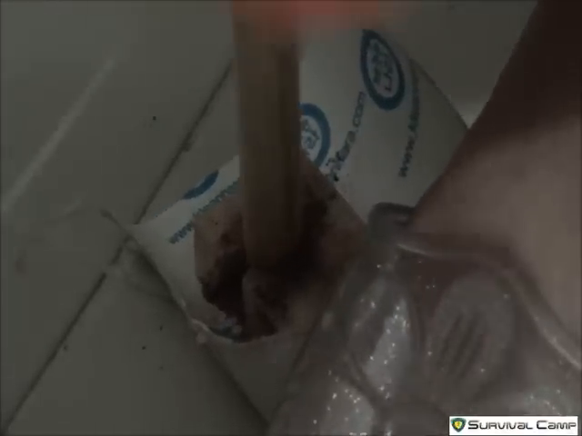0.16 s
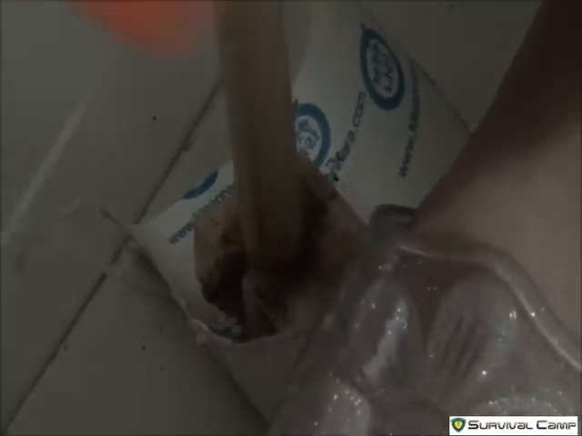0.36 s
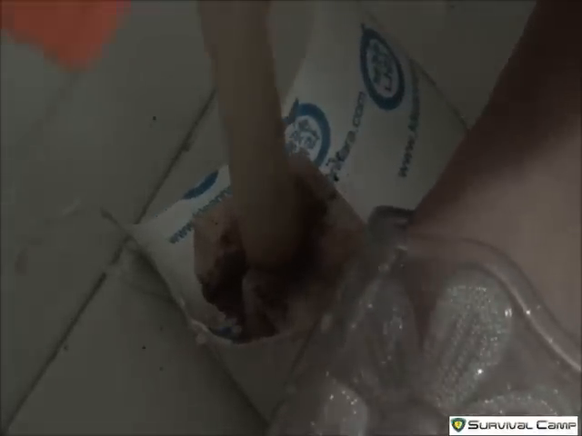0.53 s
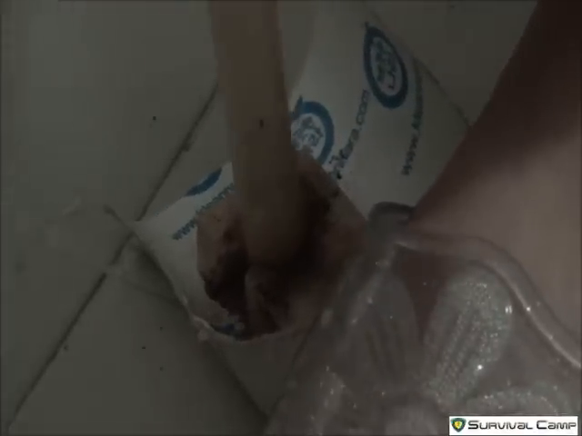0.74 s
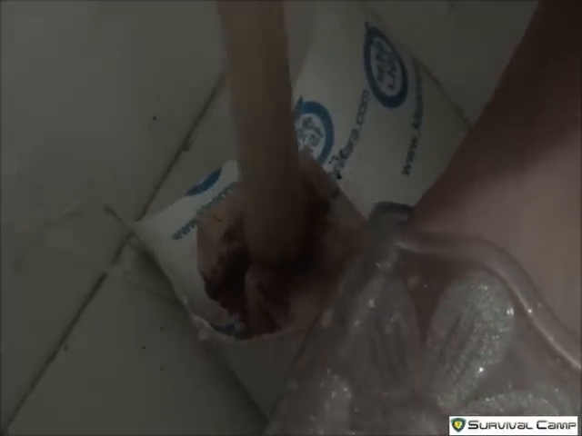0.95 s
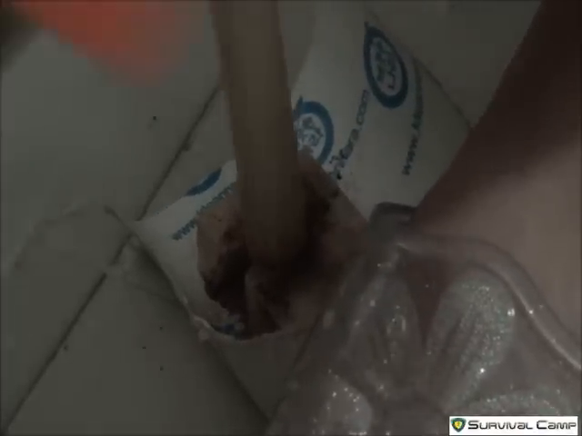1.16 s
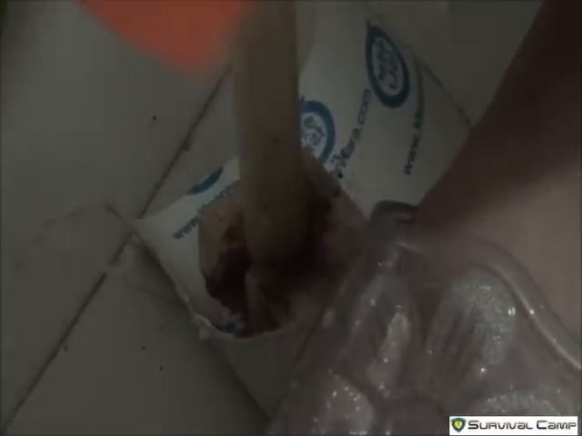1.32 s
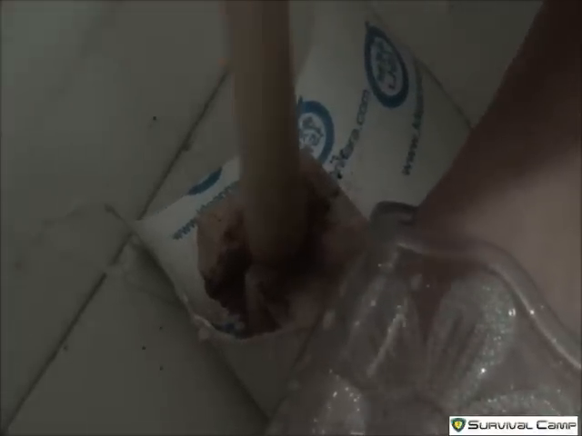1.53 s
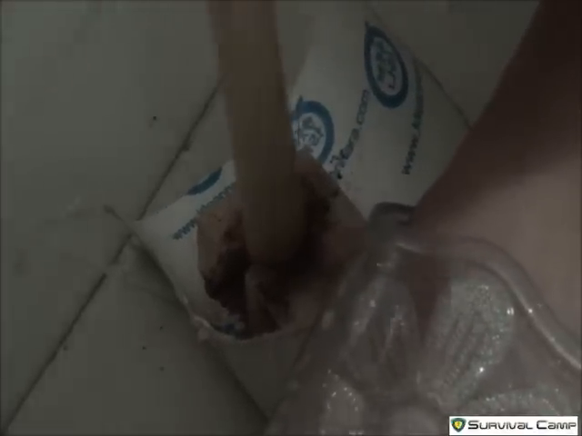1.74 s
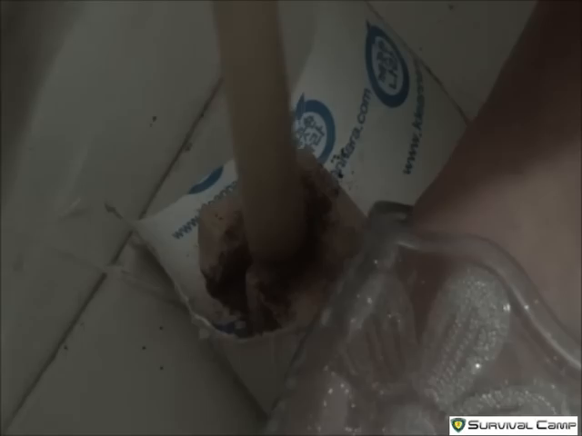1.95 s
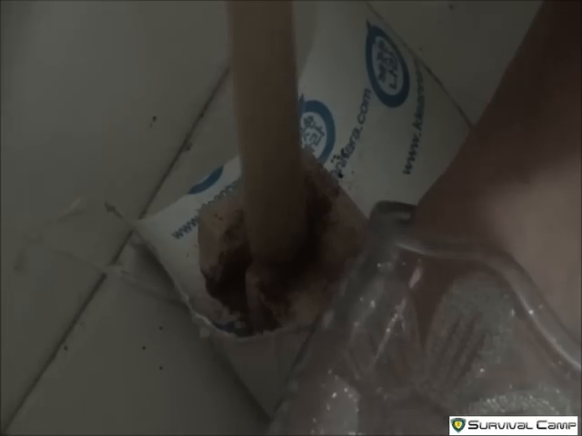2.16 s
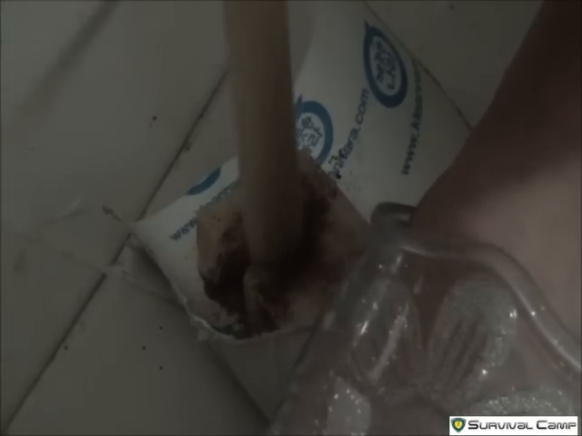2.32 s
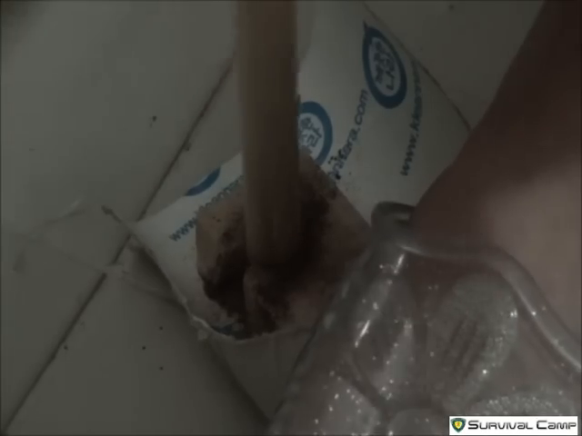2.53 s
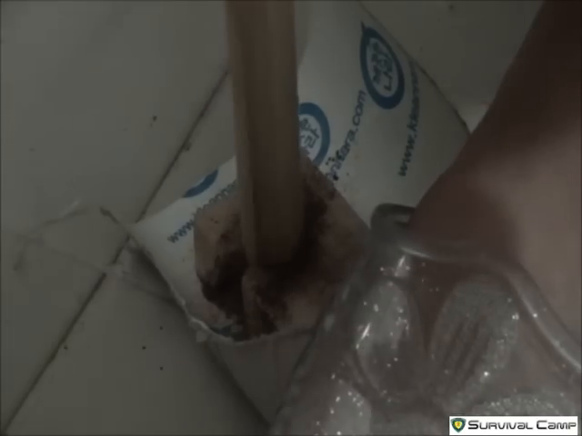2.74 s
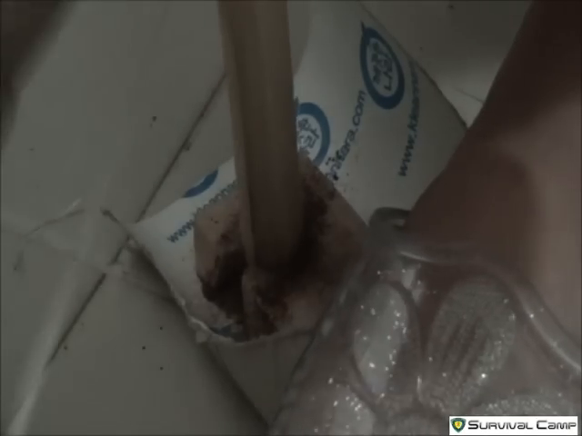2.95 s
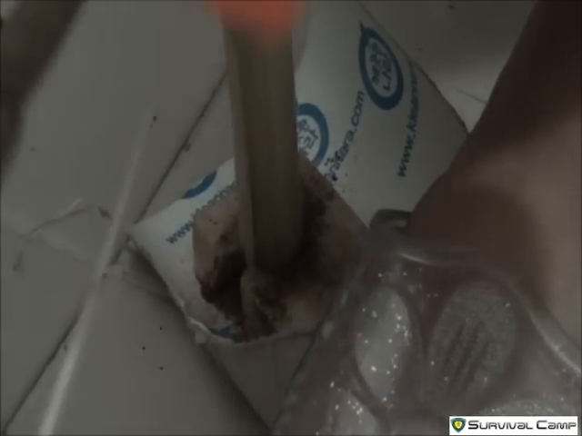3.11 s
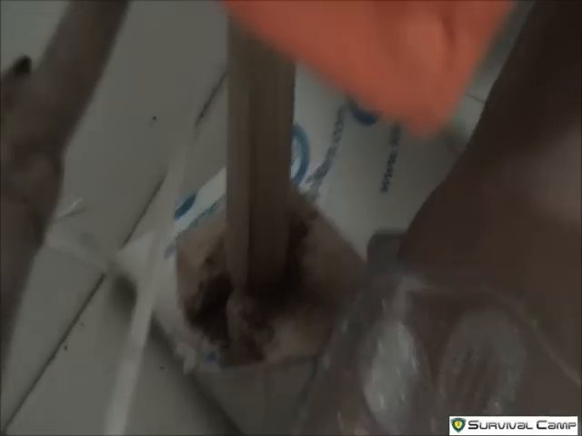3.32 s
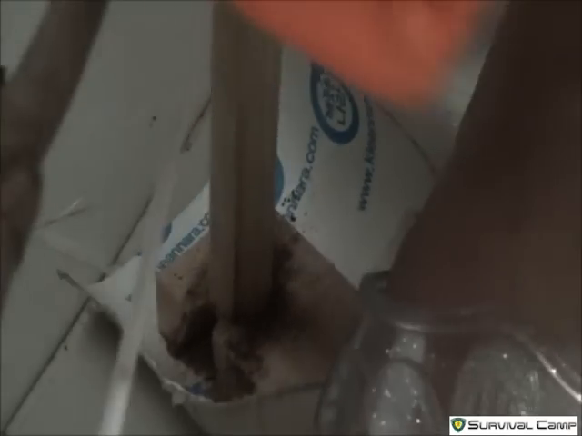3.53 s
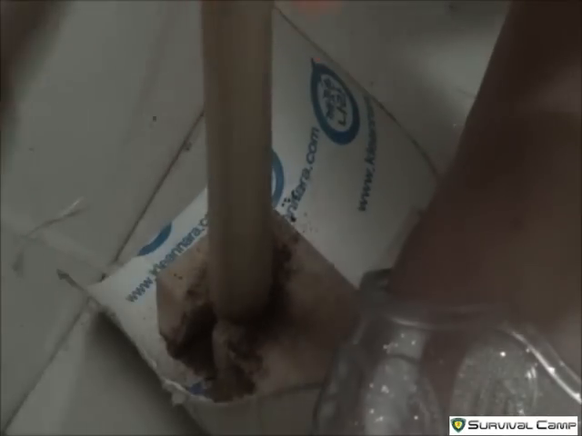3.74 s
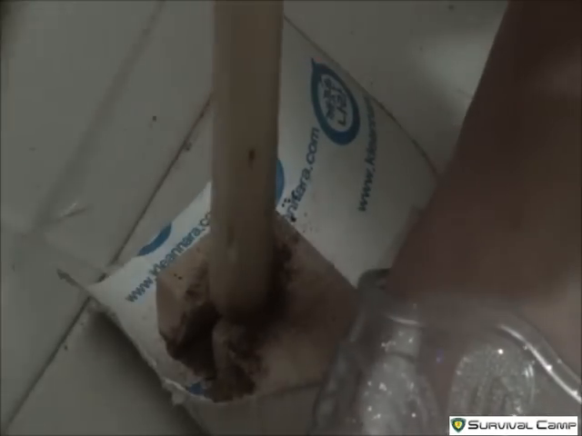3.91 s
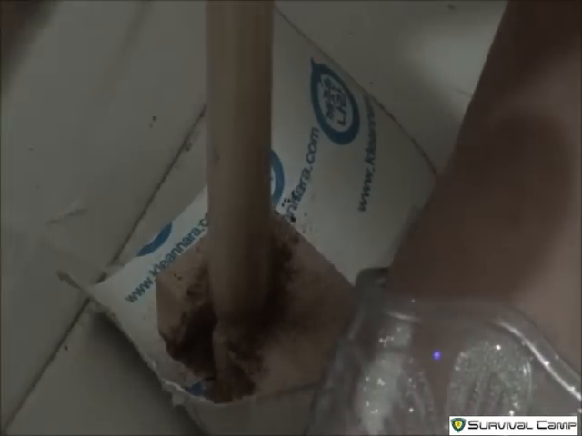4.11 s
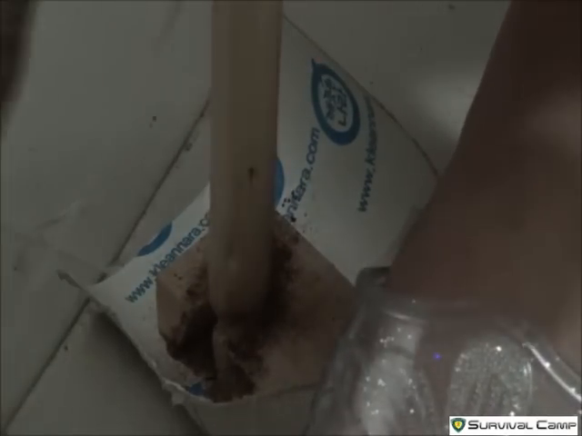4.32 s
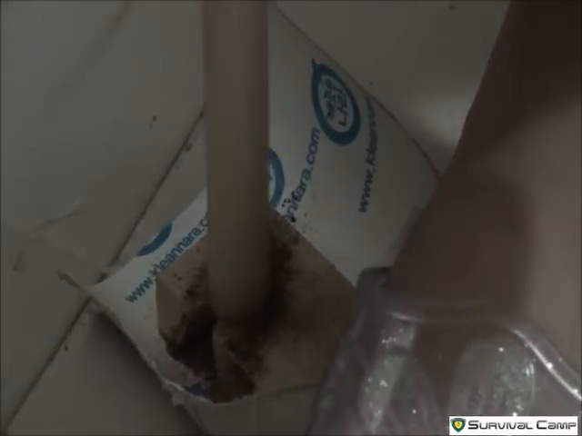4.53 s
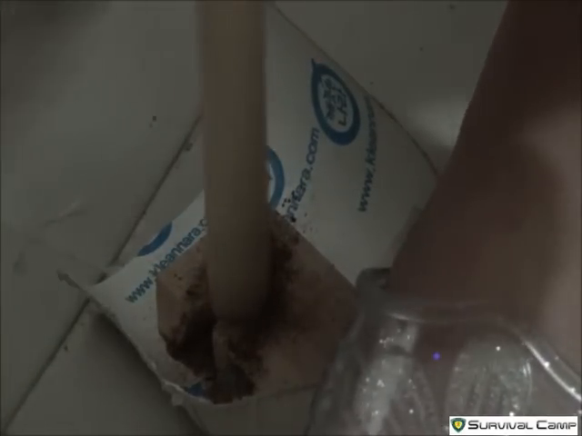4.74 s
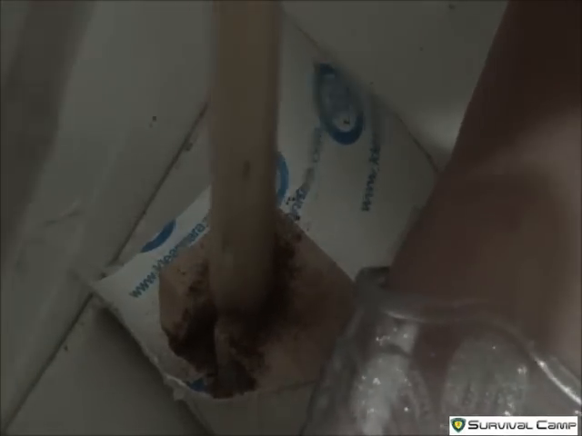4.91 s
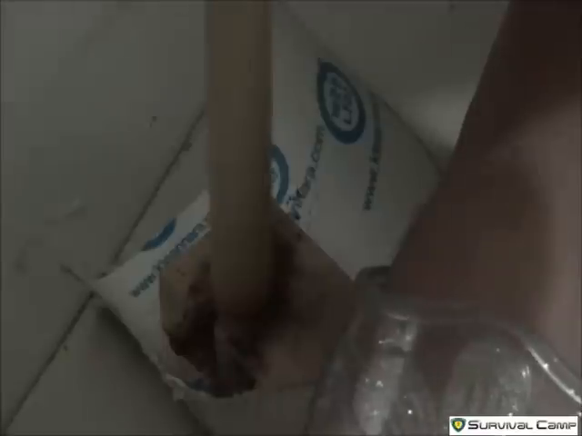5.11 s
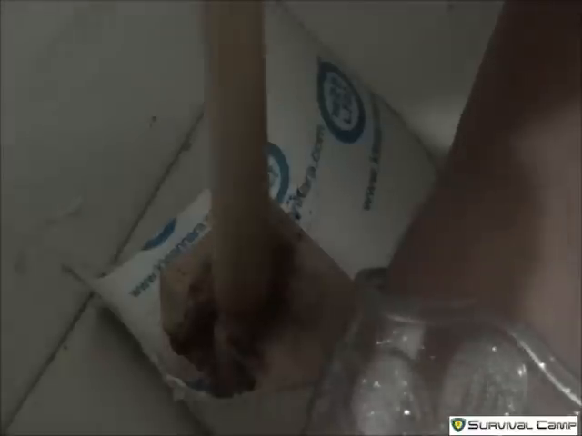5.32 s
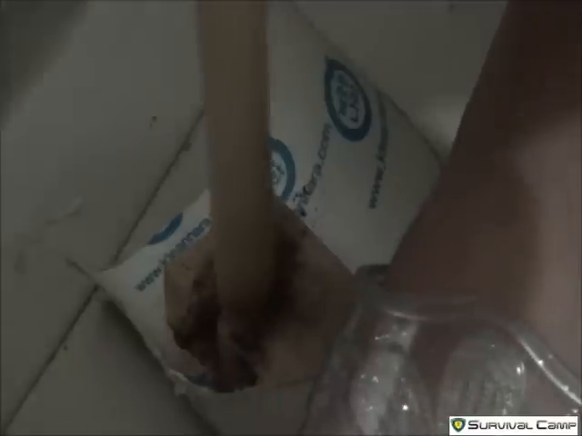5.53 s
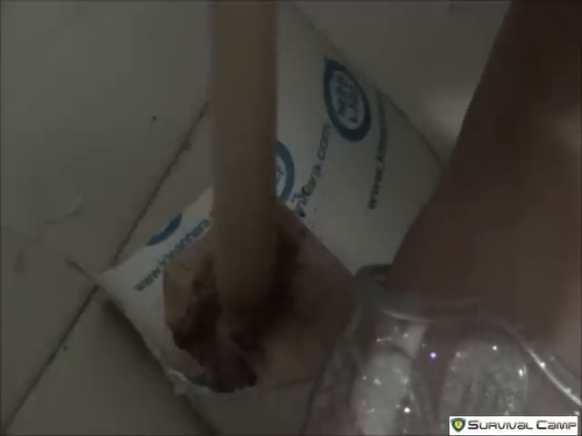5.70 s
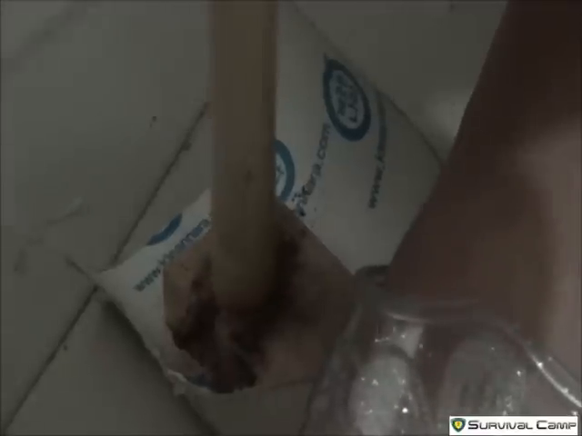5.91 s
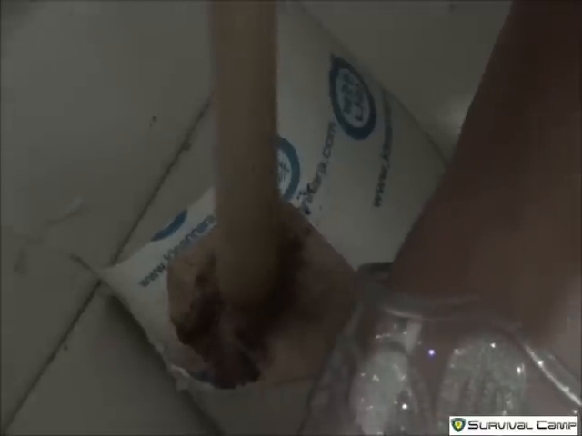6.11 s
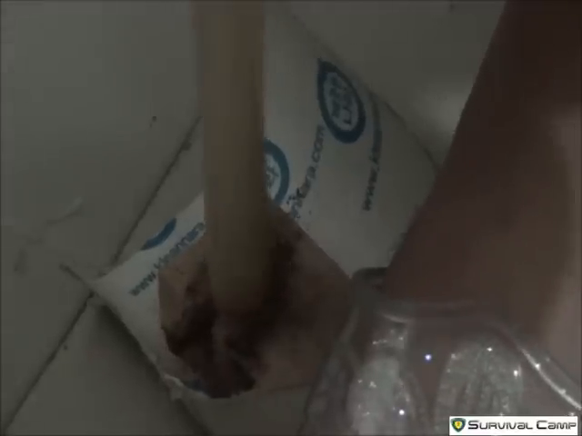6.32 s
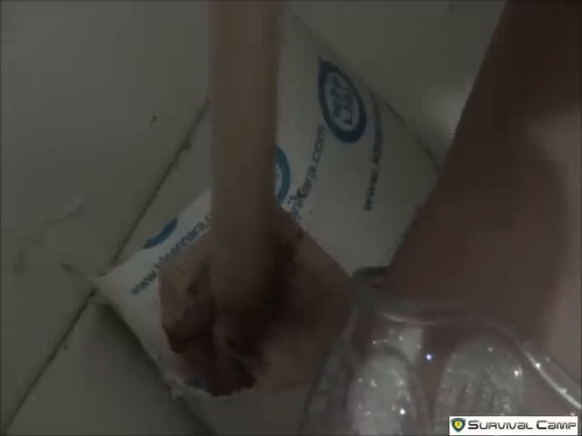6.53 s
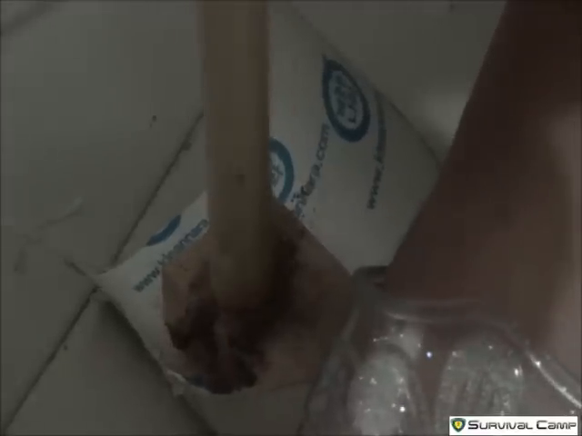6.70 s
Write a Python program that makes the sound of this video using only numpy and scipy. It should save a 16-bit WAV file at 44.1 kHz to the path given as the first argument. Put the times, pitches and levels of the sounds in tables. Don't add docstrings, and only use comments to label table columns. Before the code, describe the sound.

A close, dry bow drill starts at once: short alternating wooden rasps, roughly one every 0.15 seconds, each swelling and braking quickly. They are gritty and bright, with ringing, hissy highs over a duller board chatter. Light knocks fall near 0.7, 1.1 and 1.6 seconds, and brief rough groans colour strokes between 1.3 and 2.3. A firmer knock comes at 2.5, then the rasping dies away after 2.7. From about 2.85 to 3.65 there are only faint scuffs and tiny cord ticks over distant machine hum. Strokes resume near 3.8 with a strong knock at 3.9 and a sharp cord snap at 4.2. From 4.7 to the end the rubbing is faster, louder and heavier, with short groans, low rocking thuds and stronger floor knocks near 4.9, 5.5, 5.75, 6.0 and 6.6. The small hard room adds bright reflections throughout.

```python
import sys
import numpy as np
from scipy import signal
from scipy.fft import rfft, irfft, next_fast_len
from scipy.io import wavfile
from scipy.ndimage import uniform_filter1d, map_coordinates

SR = 44100
rng = np.random.default_rng(int(sys.argv[2]) if len(sys.argv) > 2 else 0)


def to_wav(sig):
    pcm = np.clip(np.atleast_2d(sig), -1, 1) * 32767
    pcm = np.round(pcm).astype(np.int16)
    wavfile.write(sys.argv[1], SR, pcm.T)


def nominal_scale(level):
    x = np.asarray(level, float) / 20
    return 10 ** x


N = 298116

# f/Hz, width/Hz, level/dB
BOARD_MODES = [(116, 75, -18), (215, 27, -0.5), (341, 30.5, -2), (416.6, 44, -1.5), (640, 59, 0),
               (780, 69, 1.5), (870, 250, -6), (1100, 264, -1), (1450, 2500, -7.5)]
# f/Hz, width/Hz, level/dB
BOW_MODES = [(1010, 650, -1.5), (1680, 480, 3), (2960, 1150, -1.5)]
# t/s, level/dB
HAND_WEIGHT = [(0, -3), (.6, -7.5), (1.3, -2.5), (2.3, 0.5), (2.7, -0.5), (3.4, 3), (3.9, 1), (4.6, -1),
               (5.3, 2.5), (6.0, 1), (6.76, 4.5)]
# bite t/s, hold/s, level/dB, swell over the hold/dB, grip on the socket wall/dB
PUSHES = [(0.012,0.031,-25,4.5,-2.5), (0.473,0.054,-25,-2.5,-2.5), (0.797,0.056,-22.5,1.5,0),
          (1.126,0.036,-24,-4.5,-0.5), (1.405,0.068,-23.5,0,2), (1.713,0.05,-23.5,-3.9,1.5),
          (2.006,0.041,-22.5,-4,3.5), (2.309,0.055,-23.5,-7,2.5), (2.633,0.062,-27,0,0),
          (3.788,0.093,-22.5,7.5,-3.5), (4.126,0.003,-37,9,1.5), (4.416,0.063,-22,2.5,-1),
          (4.734,0.042,-20,0.5,0), (5.009,0.048,-22.5,-4.5,0.5), (5.284,0.045,-21,-1.5,-1.5),
          (5.563,0.041,-21,1,-2), (5.834,0.045,-21.5,-2.5,0), (6.106,0.048,-21,0,0.5),
          (6.381,0.048,-21.5,2.5,-1), (6.67,0.07,-25.5,-6.5,0.5)]
# bite t/s, hold/s, level/dB, swell over the hold/dB
PULLS = [(0.26, 0.075, -43, 10.9), (0.621, 0.058, -25.0, 2.5), (0.942, 0.088, -27, 1.5),
         (1.236, 0.071, -25.5, 6), (1.538, 0.079, -24.0, 1), (1.837, 0.063, -23, 5.5),
         (2.139, 0.064, -24.5, 0), (2.452, 0.053, -26.5, -2.5), (3.186, 0.064, -55.5, -4.4),
         (3.338, 0.11, -47.5, 1), (3.986, 0.075, -27, 2), (4.272, 0.047, -26.0, 6), (4.572, 0.069, -23, 3),
         (4.856, 0.046, -20.5, 2), (5.13, 0.045, -20.5, 0), (5.409, 0.033, -19.5, 0),
         (5.684, 0.05, -20.4, 0.3), (5.949, 0.038, -20, 1.5), (6.234, 0.063, -23, -3.5),
         (6.512, 0.04, -22, 0)]
PUSH = dict(attack_db=10, release_db=20.5, wall_db=-4, shaft_db=-8, rim_db=-2.5)
PULL = dict(attack_db=10.5, release_db=16, wall_db=-8.5, shaft_db=-7.5, rim_db=-1.34)


def unit(x):
    return x / np.sqrt(np.mean(x ** 2) + 1e-20)


def along(points, hz):
    f, v = np.transpose(points)
    return np.interp(np.log(hz + 1), np.log(f + 1), v)


def curves(rows):
    s, *cols = np.transpose(rows)
    return [np.interp(np.arange(N) / SR, s, c) for c in cols]


def wobble(rate, size=N):
    return map_coordinates(rng.standard_normal(size // 64), [np.arange(size) * rate / SR])


def filtered(x, response):
    m = next_fast_len(N + SR // 2)
    return irfft(rfft(x, m) * response(np.fft.rfftfreq(m, 1 / SR)), m)[..., :N]


def modes(table):
    def response(f):
        total = 0
        for k, (centre, width, db) in enumerate(table):
            damping = 1j * f * width
            total = total + (-1) ** k * nominal_scale(db) * damping / (centre * centre - f * f + damping)
        return total
    return response


def wavering(hz, waver_hz, rate):
    turns = np.cumsum(hz + waver_hz * wobble(rate, size=len(hz))) / SR
    size = nominal_scale(2.2 * wobble(rate, size=len(hz)))
    return np.sqrt(2) * size * np.sin(2 * np.pi * turns)


def slips(per_s, spread_db, hiss):
    chance, size, sign = rng.random(N), rng.exponential(size=N), rng.standard_normal(N)
    jolts = (chance < per_s / SR) * nominal_scale(spread_db * np.minimum(size, 3)) * np.tanh(sign)
    return unit(jolts) + hiss * rng.standard_normal(N)


def patchy(x, fine_db, broad_db):
    z = signal.stft(x, nperseg=512)[2]

    def field(bins, frames):
        over_pitch = uniform_filter1d(rng.standard_normal(z.shape), bins, 0)
        return unit(uniform_filter1d(over_pitch, frames, 1))

    gain_db = fine_db * field(bins=3, frames=4) + broad_db * field(bins=8, frames=14)
    return signal.istft(z * nominal_scale(gain_db), nperseg=512)[1][:N]


def strokes(rows, attack_db, release_db, **_):
    bend = 1.21
    t, gain = np.arange(0, N, 32) / SR, 0
    for s, hold, db, swell_db, *_ in rows:
        early = np.clip(s - t, 0, 1) / .03
        late = np.clip(t - s - hold, 0, 1) / .03
        held = np.clip((t - s) / (abs(hold) + 1e-3), 0, 1)
        flanks_db = attack_db * early ** bend + release_db * late ** bend
        gain = gain + nominal_scale(db + swell_db * (held - .5) - flanks_db)
    return np.interp(np.arange(N) / SR, t, gain)


def hum():
    # f/Hz, level/dB per Hz
    hum_spectrum = [(20, -24), (33, 3.5), (50, -5.5), (120, -9.5), (250, 1), (295, 6.5), (340, -9.5),
                    (614, -1.5), (800, -4.5), (1300, -7.5), (1700, -13.5), (4000, -22.5), (10000, -27.5),
                    (16000, -33)]
    # f/Hz, correlation/1
    likeness = [(60, 1), (240, 1), (950, 0.94), (3770, 0.77), (15000, 0.94)]

    def mid_side(hz):
        turn = np.arccos(np.clip(along(likeness, hz), -1, 1)) / 2
        return nominal_scale(along(hum_spectrum, hz)) * [np.cos(turn), np.sin(turn)]

    mid, side = filtered(rng.standard_normal((2, N)), mid_side)
    return nominal_scale(-46.5 + 0.26 * wobble(4.2)) * unit(np.array([mid + side, mid - side]))


def room(x):
    # f/Hz, t60/s
    decay = [(100, 0.48), (700, 0.47), (4000, 0.65), (9000, 0.33), (14000, 0.2)]
    # f/Hz, level/dB
    ear_difference = [(30, -11), (90, -16), (700, -5), (3000, -6.5), (7000, -8), (13000, -18.5)]
    hop, out = SR // 5, np.zeros((2, N + 2 * SR))
    padded = np.pad(x, (hop, 2 * hop))
    for start in range(0, N + hop, hop):
        hz, t, z = signal.stft(rng.standard_normal((2, 2 * hop)), SR, nperseg=256)
        tail = signal.istft(z * nominal_scale(-60 * t / along(decay, hz)[:, None]), SR, nperseg=256)[1]
        piece = padded[start:][:2 * hop] * np.hanning(2 * hop)
        answer = signal.fftconvolve(piece[None], tail / np.linalg.norm(tail[0]), axes=1)
        out[:, start + 120:][:, :answer.shape[1]] += answer
    mid, side = out[:, hop:hop + N]
    side = filtered(side, lambda f: nominal_scale(along(ear_difference, f)))
    return np.array([mid + side, mid - side])


def ticks():
    # t/s, peak level/dB, body level/dB, length/s
    cord_ticks = [(0.4226, -27, -28, 0.017), (1.089, -21, -21, 0.02), (2.863, -49.5, 14, 0.015),
                  (2.883, -62, 8, .006), (3.334, -38, 15, 0.0012), (3.3375, -31, 3, 0.0018),
                  (3.42, -27.5, 0, 0.0024), (3.644, -47, 8, .006), (3.655, -48, -1, 0.0051),
                  (4.121, -31, -2, 0.033), (4.2094, -11.5, -13, 0.0025), (4.2119, -16.5, -12, 0.0036),
                  (4.343, -12.5, -1.5, 0.0011), (4.703, -26, -13, .02), (4.844, -17, -22, 0.025),
                  (6.3441, -18.5, -6.5, 0.017)]
    # f/Hz, level/dB
    snap_colour = [(1500, -120), (3000, -7), (5500, 1), (9000, 6), (12000, -2), (16000, -23)]
    snaps, wood, t = np.zeros(N + SR), np.zeros(N + SR), np.arange(SR // 20) / SR
    for s, db, body_db, length in cord_ticks:
        burst = nominal_scale(db - 40 * (t / length) ** 2) * np.tanh(3 * rng.standard_normal(len(t)))
        snaps[round(s * SR):][:len(t)] += burst
        wood[round(s * SR):][:len(t)] += nominal_scale(body_db + 7.5) * burst
    bright = filtered(snaps[:N], lambda f: nominal_scale(along(snap_colour, f)))
    return bright + filtered(wood[:N], modes(BOW_MODES))


def knocks():
    # t/s, peak level/dB, brightness/dB, rattle t60/s
    floor_knocks = [(0.002, -33.5, -8, 1), (0.691, -21, -8, 0.18), (1.066, -26.5, 2, 0.14),
                    (1.586, -22, -18, 0.11), (2.004, -36, -9, 0.12), (2.453, -33, -4, 0.14),
                    (2.498, -18.5, -1, 0.25), (3.878, -9, -12, 0.25), (4.325, -19, 12, 0.2),
                    (4.917, -12.5, 6, 0.15), (5.078, -24, -16, 0.12), (5.365, -26, 3, 0.078),
                    (5.457, -10.5, -6, 0.23), (5.747, -15, 2, 0.22), (6.005, -8.5, -11, 0.45),
                    (6.344, -17.5, 7, 0.17), (6.569, -8, -13, 0.26)]
    blows, cracks, t = np.zeros(N + SR), np.zeros(N + SR), np.arange(SR // 4) / SR
    for s, db, bright_db, t60 in floor_knocks:
        push = t / .00016 * np.exp(1 - t / .00016)
        rattle_db = 3 * wobble(160, size=len(t)) - 60 * t / (1.1 * t60)
        bounces = .28 * rng.standard_normal(len(t)) * nominal_scale(rattle_db)
        blows[round(s * SR):][:len(t)] += nominal_scale(db + 7.0) * (push + bounces)
        cracks[round(s * SR):][:len(t)] += nominal_scale(db + bright_db - 12) * (push + bounces / 2)
    return filtered(blows[:N], modes(BOARD_MODES)) + filtered(cracks[:N], modes(BOW_MODES))


def groans():
    # t/s, length/s, first f/Hz, last f/Hz, level/dB
    glides = [(0.505, 0.014, 640, 644, -42), (1.267, 0.067, 640, 620, -46), (1.402, 0.096, 640, 626, -42),
              (1.404, .08, 1280, 1264, -43), (1.51, 0.2, 640, 666, -43.5), (1.72, 0.16, 900, 780, -41),
              (2.008, 0.25, 640, 662, -55), (2.299, 0.062, 215, 244, -38), (2.281, 0.11, 1490, 1450, -53),
              (4.309, 0.18, 558.5, 453, -47), (4.423, 0.063, 1403, 1580, -40),
              (4.733, 0.065, 640, 664, -40), (4.815, 0.062, 1060, 733, -36), (5.07, 0.047, 804, 800, -39.5),
              (5.158, 0.044, 666, 653, -41), (6.047, 0.14, 640, 615, -48)]
    out = np.zeros(N)
    for s, length, first_hz, last_hz, db in glides:
        done = np.clip(np.arange(SR // 4) / SR / length, 0, 1)
        swell = np.abs(np.sin(np.pi * done)) ** 0.35
        tone = wavering(first_hz + (last_hz - first_hz) * done, 45, rate=140)
        out[round(s * SR):][:len(done)] += nominal_scale(db) * swell * tone
    return out


def board():
    # t/s, thud level/dB, upper thud level/dB
    rocks = [(0.72, -44, -46), (1.11, -38, -48), (1.31, -49, -48), (1.38, -49, -72), (1.47, -44, -62),
             (1.6, -47, -47), (1.71, -42, -54), (1.8, -48, -37), (1.9, -34.5, -49), (2.19, -41, -49),
             (2.38, -52, -54), (2.47, -53, -61), (3.92, -42, -57), (4.33, -54, -45), (4.4, -51, -43),
             (4.47, -44, -45), (4.71, -43, -61), (4.95, -32, -33), (5.2, -38, -42), (5.39, -55, -63),
             (5.48, -33.5, -30.5), (5.63, -39, -60), (5.771, -29, -32.5), (5.9, -43, -54), (6.03, -40, -32),
             (6.1, -43, -51), (6.19, -57, -51), (6.3, -35, -37), (6.59, -33, -33.5), (6.71, -53, -54)]
    thud_hz = (87, 158.3)
    rise_s, t60_s = 0.044, 0.18
    weight_db, = curves(HAND_WEIGHT)
    rasp = strokes(PUSHES, **PUSH) + strokes(PULLS, **PULL)
    busy = uniform_filter1d(rasp, int(0.1 * SR))
    shake = nominal_scale(-40 + 0.78 * weight_db) * (np.abs(busy) / nominal_scale(-26.5)) ** 0.53
    chatter = unit(filtered(slips(per_s=900, spread_db=2.5, hiss=0.54), modes(BOARD_MODES)))
    flutter_db = 1.6 * wobble(25)

    s, *rock_db = np.transpose(rocks)
    since = np.arange(0, N, 64)[:, None] / SR - s
    shape_db = np.where(since < 0, -20 * (since / rise_s) ** 2, -60 * since / t60_s)
    tremble = nominal_scale(-15.5) * shake
    low, high = (np.repeat(nominal_scale(db + shape_db).sum(axis=1), 64)[:N] + tremble for db in rock_db)
    thud, upper = (wavering(np.full(N, hz), 0.084 * hz, rate=37) for hz in thud_hz)
    return shake * nominal_scale(flutter_db) * chatter + nominal_scale(-2.4) * low * thud + nominal_scale(-3.2) * high * upper


def spindle():
    # f/Hz, width/Hz, level/dB
    tip_modes = [(5100, 400, -6), (6220, 234, -2), (6680, 150, -2), (7110, 157, 0.5), (7170, 127, -1),
                 (7660, 730, -5), (11400, 1240, -10.5), (12650, 880, -12.5), (15200, 1900, -15.5)]
    # f/Hz, width/Hz, level/dB
    wall_modes = [(3728, 460, -0.5), (4093, 333, 3.5), (4260, 208, 4), (4633, 150, 1)]
    # f/Hz, width/Hz, level/dB
    shaft_modes = [(1810, 2000, -8.5), (2258, 158, 1.5), (2530, 147, 1), (2705, 274, 3), (3050, 430, -3),
                   (3694, 65, 6)]
    # f/Hz, width/Hz, level/dB
    rim_modes = [(8750, 500, -5), (9220, 400, -2), (9660, 320, 0), (10060, 520, -2)]
    weight_db, = curves(HAND_WEIGHT)
    catch_db = .4 * wobble(50) + .8 * wobble(150)
    drive = patchy(slips(per_s=5000, spread_db=2.9, hiss=.8), fine_db=1.6, broad_db=.7)
    bodies = (tip_modes, wall_modes, shaft_modes, rim_modes)
    tip, wall, shaft, rim = (unit(filtered(drive, modes(body))) for body in bodies)

    def voice(way):
        return tip + nominal_scale(way["shaft_db"] + weight_db) * shaft + nominal_scale(way["rim_db"]) * rim

    push, pull = strokes(PUSHES, **PUSH), strokes(PULLS, **PULL)
    gripped = [(s, hold, db + grip_db + PUSH["wall_db"], swell_db)
               for s, hold, db, swell_db, grip_db in PUSHES]
    against_wall = strokes(gripped, **PUSH) + nominal_scale(PULL["wall_db"]) * pull
    return nominal_scale(catch_db - 2.0) * (push * voice(PUSH) + pull * voice(PULL) + against_wall * wall)


def scene():
    rub = spindle() + board() + groans()
    hits = knocks() + ticks()
    return rub + hits + room(nominal_scale(-8.0) * rub + nominal_scale(-3.5) * hits) + hum()


def band_limit(x):
    return signal.sosfilt(signal.butter(12, 17000, fs=SR, output="sos"), x)


def record(dry):
    mix = filtered(dry, lambda hz: hz < 15720)
    return band_limit(mix)


dry = scene()
out = record(dry)
to_wav(out)
```